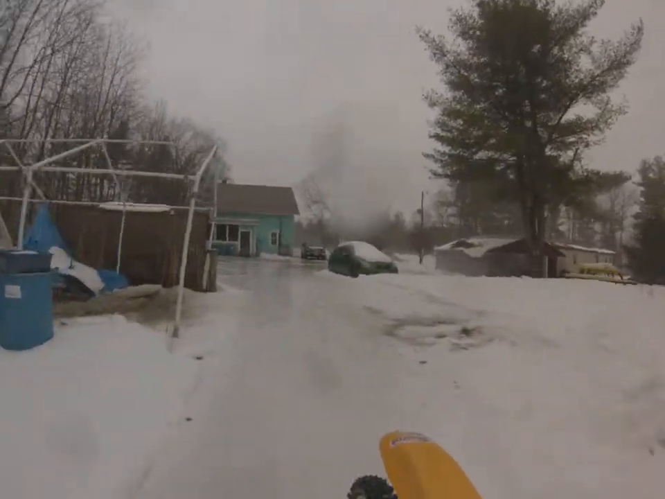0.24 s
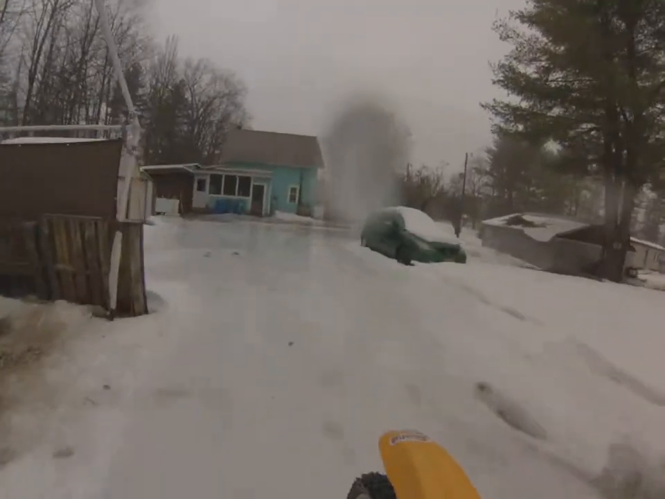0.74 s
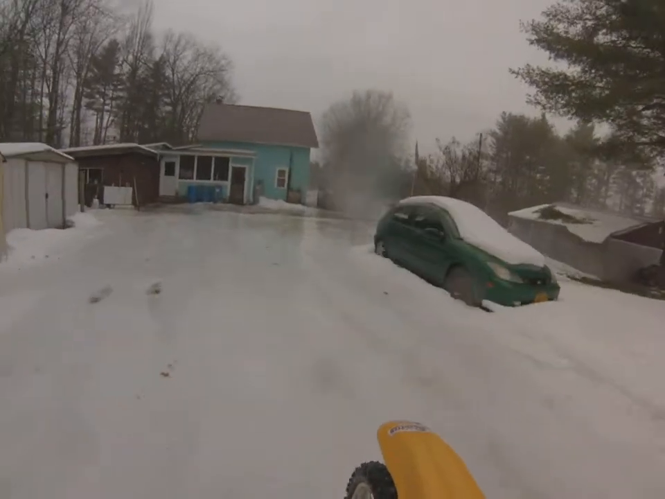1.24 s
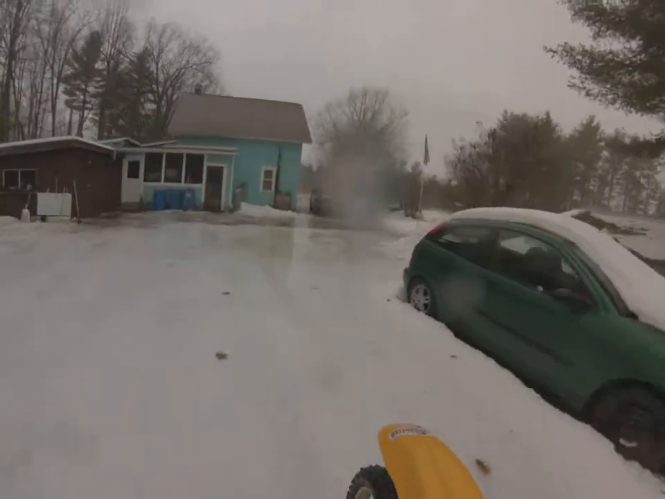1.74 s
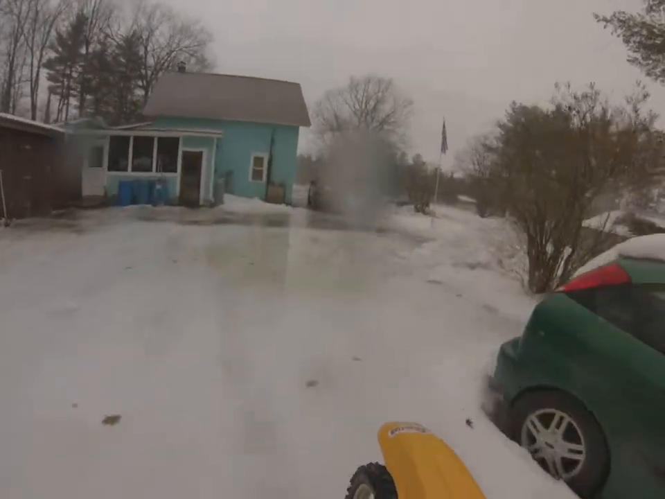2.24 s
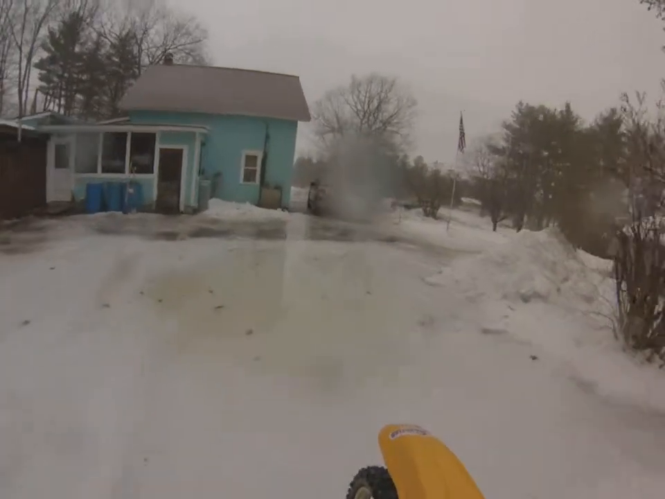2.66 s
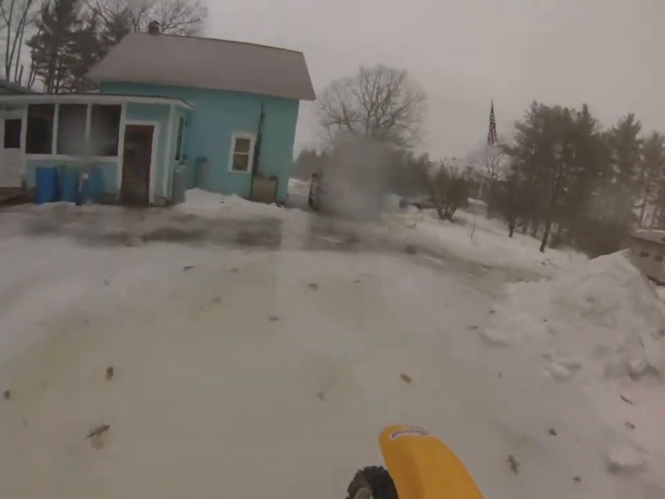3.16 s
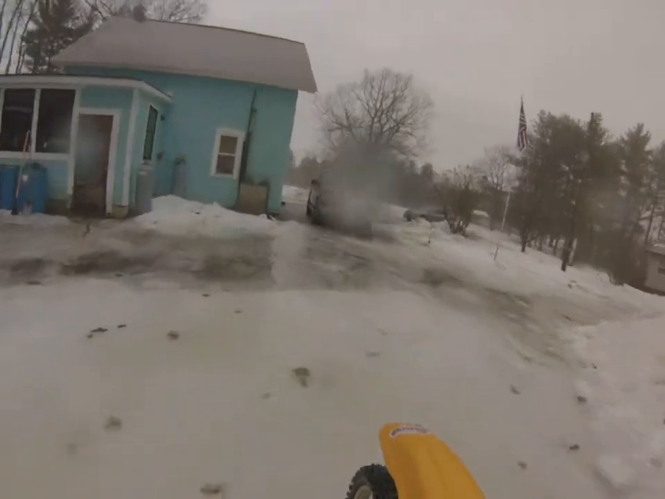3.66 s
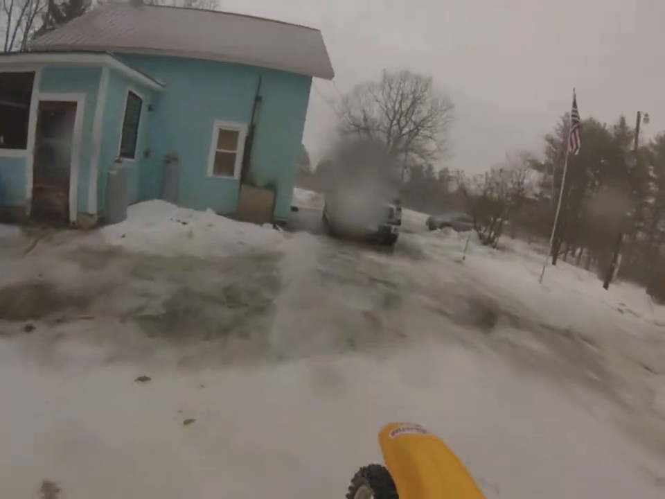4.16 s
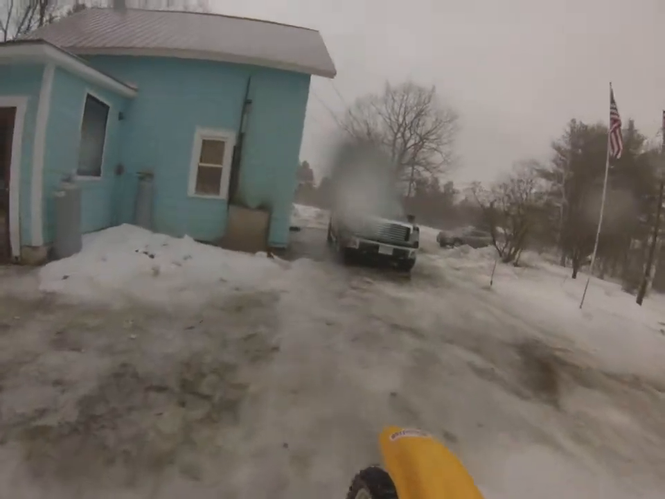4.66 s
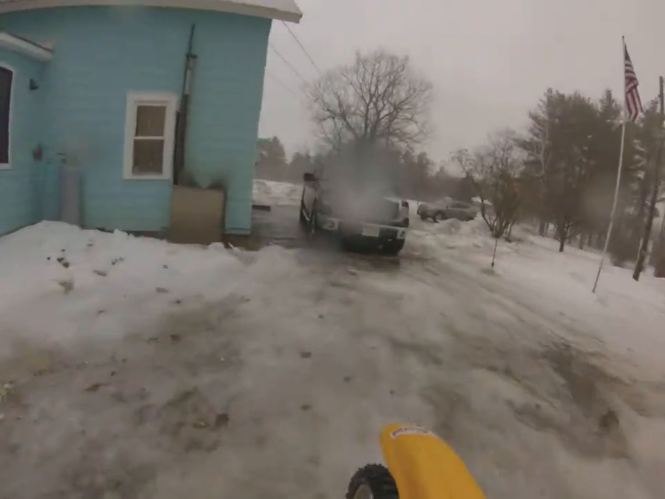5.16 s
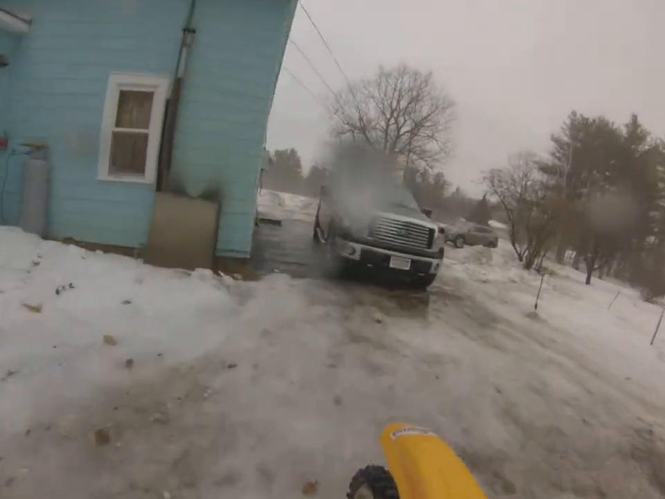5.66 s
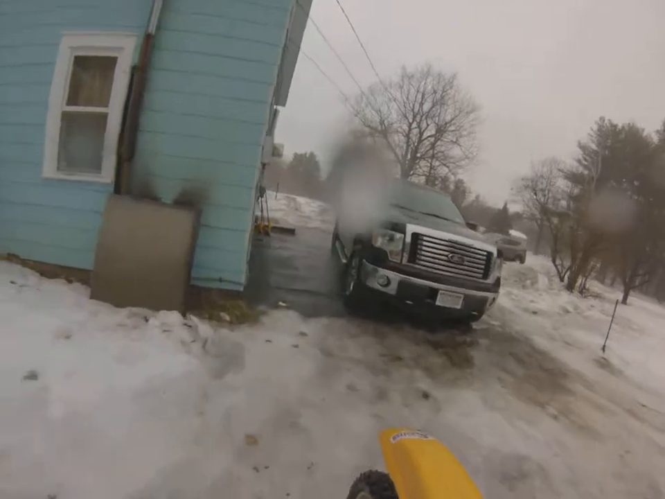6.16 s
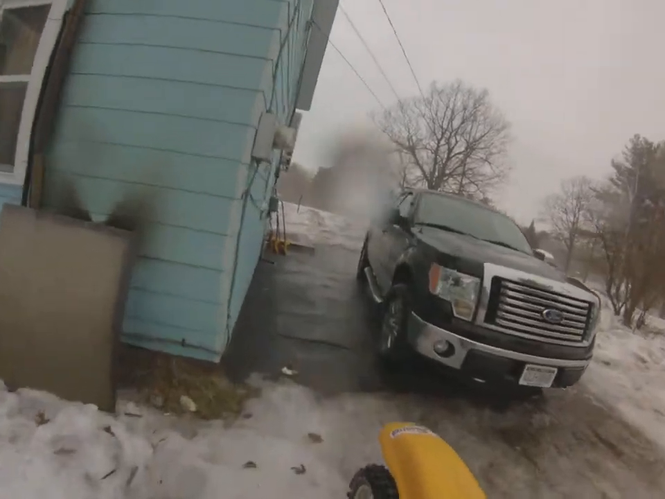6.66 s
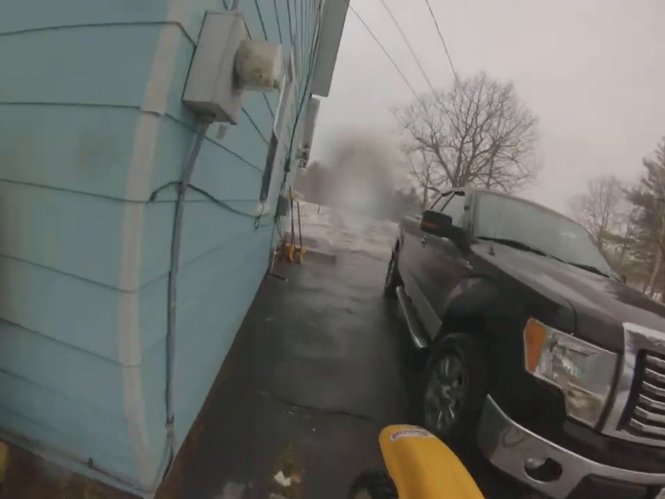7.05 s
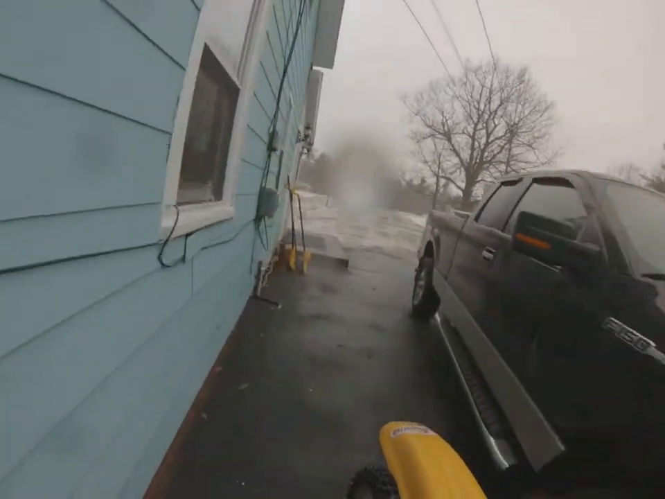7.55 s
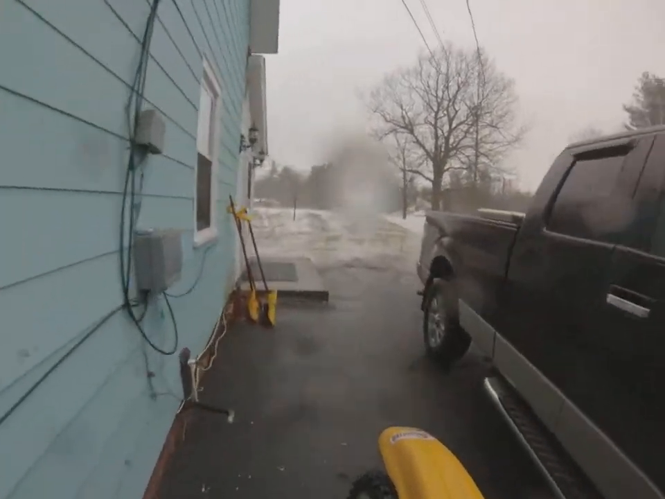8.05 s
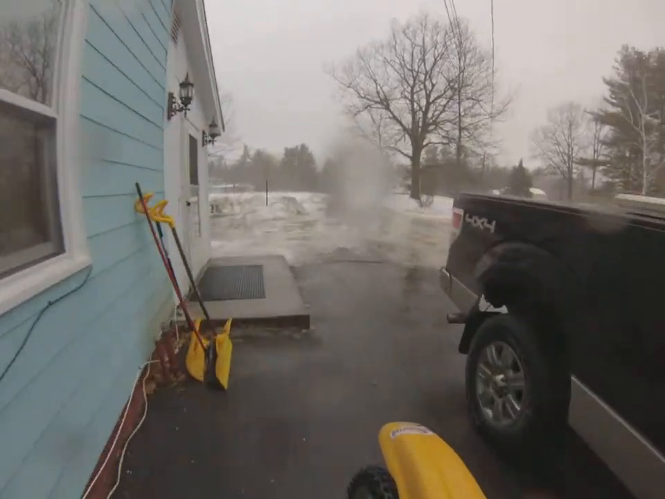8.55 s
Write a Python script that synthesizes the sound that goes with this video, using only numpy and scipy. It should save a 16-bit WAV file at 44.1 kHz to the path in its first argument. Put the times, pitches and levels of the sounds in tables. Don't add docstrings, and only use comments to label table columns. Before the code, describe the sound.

Buzzing two-stroke motor revs in two quick bursts, coasts lower, then sputters unevenly while muffled bumps, slush hiss and tiny ticks surround it.

```python
import sys
import numpy as np
from scipy import signal
from scipy.fft import rfft, irfft, next_fast_len
from scipy.io import wavfile
from scipy.ndimage import uniform_filter1d

SR = 44100
rng = np.random.default_rng(int(sys.argv[2]) if len(sys.argv) > 2 else 0)


def level_to_linear(level):
    exponent = np.asarray(level, float) / 20
    return 10 ** exponent


def store_wav(level_fs):
    pcm = np.round(np.clip(np.atleast_2d(level_fs), -1, 1) * 32767)
    wavfile.write(sys.argv[1], SR, pcm.T.astype(np.int16))


N = 388080

# [t/s, speed/(turns per s)]
CRANK_SPEED = [(0.0, 69.5), (0.24, 78), (0.29, 68.5), (0.39, 69.8), (0.51, 89), (0.66, 69.3), (0.81, 64),
               (0.97, 63.2), (1.22, 53.6), (1.51, 47.9), (1.75, 45.2), (2.42, 41.3), (3.05, 38),
               (3.6, 39.8), (4.1, 34.3), (4.65, 27.5), (5.6, 25.7), (8.8, 34.4)]
USUAL_THROTTLE_DB = -36


def in_time(rows):
    s, *columns = np.transpose(rows)
    return [np.interp(np.arange(N) / SR, s, c) for c in columns]


def rms_one(x):
    return x / np.sqrt(np.mean(x ** 2) + 1e-20)


def evened(x, over_s):
    return x / np.sqrt(np.maximum(uniform_filter1d(x ** 2, int(over_s * SR)), 1e-14))


def wander(over_s):
    span = int(over_s * SR)
    return rms_one(uniform_filter1d(uniform_filter1d(rng.standard_normal(N), span), span))


def stretches(rows, edge_s):
    t = np.arange(N) / SR
    return sum(level_to_linear(db) * np.clip(np.minimum(t - start, end - t) / edge_s + .5, 0, 1)
               for start, end, db in rows)


def butter(x, order, hz, kind="low"):
    return signal.sosfilt(signal.butter(order, hz, kind, fs=SR, output="sos"), x)


def resonance(x, hz, width_hz):
    r = np.exp(-np.pi * width_hz / SR)
    turn = 2 * r * np.cos(2 * np.pi * hz / SR)
    return signal.lfilter((1 - r * r) / 2 * np.array([1, 0, -1]), [1, -turn, r * r], x)


def body(drives, modes):
    out = 0
    for k, (drive, (hz, width_hz, db)) in enumerate(zip(drives, modes)):
        out = out + (-1) ** k * level_to_linear(db) * resonance(drive, hz, width_hz) / np.sqrt(width_hz / 100)
    return out


def colour(x, spectrum):
    hz, db = np.transpose(spectrum)
    size = next_fast_len(N)
    grid = np.maximum(np.arange(size // 2 + 1) * SR / size, 1)
    gain = level_to_linear(np.interp(np.log(grid), np.log(hz), db, -90, -90))
    return irfft(rfft(x, size) * gain, size)[:N]


def spikes(times, sizes):
    out = np.zeros(N)
    np.add.at(out, np.clip((np.asarray(times) * SR).astype(int), 0, N - 1), sizes)
    return out


def dying(clicks, rise_s, fall_s):
    for tau in (rise_s, fall_s):
        clicks = signal.lfilter([1], [1, -np.exp(-1 / (tau * SR))], clicks + 1e-18)
    return clicks / (rise_s * SR)


def bump(clicks, width_s):
    size = int(width_s * SR)
    return signal.oaconvolve(clicks, np.hanning(size) * np.geomspace(1, .12, size), "same")


def crank_turns(fired, slowing):
    turns = np.cumsum(in_time(CRANK_SPEED)[0]) / SR
    first = int(fired[0] * SR)
    turns += np.ceil(turns[first]) - turns[first]
    times = list(np.flatnonzero(np.diff(np.floor(turns[:first - 200]))) / SR)
    times.insert(0, 2 * times[0] - times[1])
    marks = []
    for start, end in zip(fired, [*fired[1:], N / SR + 0.19]):
        count = max(1, round((end - start) * np.interp(start, *np.transpose(CRANK_SPEED))))
        part = np.arange(count) / count
        marks.append(len(times))
        times += list(start + (end - start) * (part - slowing * part * (1 - part)))
    return np.array(times), np.array(marks)


def crank_angle(times):
    times = np.r_[2 * times[0] - times[[3, 2, 1]], times]
    turns = np.interp(np.arange(-500, N) / SR, times, np.arange(len(times)))
    return 2 * np.pi * uniform_filter1d(turns, size=500)[500:]


def rumble():
    # [f/Hz, level/dB per Hz]
    deep_spectrum = [(8.8, -32), (15, -4), (38, 5), (59, 1), (79, -6.5), (140, -27.5), (182, -21.5),
                     (220, -22), (290, -62), (480, -120)]
    return level_to_linear(-30.5) * rms_one(colour(rng.standard_normal(N), deep_spectrum))


def whine():
    # [f/Hz, level/dB]
    whine_tones = [(8448, -93), (12672, -90)]
    return sum(level_to_linear(db) * np.sin(2 * np.pi * hz * np.arange(N) / SR) for hz, db in whine_tones)


def mount(fires):
    # [t/s, level/dB, half length/s]
    ground_bumps = [(0.19, -16, 0.13), (0.528, -16, 0.059), (0.914, -19, 0.14), (2.334, -7, 0.037),
                    (3.273, -13.5, 0.023), (3.616, -10.5, 0.058), (3.759, -11.5, 0.03), (3.931, -14, 0.026),
                    (4.077, -13.5, 0.078), (4.42, -24, 0.048), (4.725, -16.5, 0.042), (4.9, -17.5, 0.12),
                    (5.17, -16, 0.064), (5.315, -14, 0.029), (5.55, -14.5, 0.09), (6.013, -17, 0.14),
                    (6.257, -19, 0.041), (6.443, -14.5, 0.045), (6.574, -24, 0.059), (6.71, -47, .03),
                    (6.842, -18.5, 0.1), (7.114, -20, 0.31), (7.366, -21, 0.071), (7.705, -17, 0.13),
                    (7.965, -20, 0.13), (8.23, -20.5, 0.23), (8.541, -15, 0.064), (8.76, -20.5, 0.11)]
    mount_hz, width_hz = 48.15, 2.22
    s, peak_db, _ = fires.T
    push = rms_one(spikes(s, level_to_linear(peak_db))) + 0.89 * rng.standard_normal(N)
    swing = resonance(resonance(push, mount_hz, width_hz), mount_hz, 3 * width_hz)
    t = np.arange(N) / SR
    height = level_to_linear(-37.5)
    for at, db, half_s in ground_bumps:
        height = height + level_to_linear(db) * np.exp(-((t - at) / half_s) ** 2)
    return level_to_linear(-8.0) * height * evened(swing, over_s=0.034)


def shake(times):
    # [speed/(turns per s), first, second, third order/dB]
    mount_response = [(29.7, -45, -44, -54.5), (40.8, -18.5, -52, -87), (43.6, -15.5, -36, -50),
                      (52.1, -13.5, -49, -50), (54.9, -33, -53, -51), (62, -18.5, -34.5, -53),
                      (79, -15.5, -31.5, -55), (93, -33, -32, -44)]
    angle = crank_angle(times)
    speed = in_time(CRANK_SPEED)[0]
    rate, *orders_db = np.transpose(mount_response)
    sway = 2.9 * np.sin(angle / 16.0)
    out = 0
    for k, db in enumerate(orders_db):
        wander_db = 3.5 * k * np.sin(angle / (7.3 + k) + sway)
        out = out + level_to_linear(np.interp(speed, rate, db) + wander_db) * np.sin((k + 1) * angle + k + 4.41)
    return np.sqrt(2) * out


def drops():
    # [t/s, level/dB at about 5.1 kHz, then level/dB at 2-3.5, 6.5-9 and 9-14 kHz]
    drop_taps = [(0.0515, -31, -31, -25, -43.5), (0.165, -40, -41, -44, -48.5), (0.859, -50, -43, -71, -61),
                 (1.195, -41, -40, -45, -57), (1.226, -46.5, -41, -54, -58.5),
                 (1.9899, -33, -35, -27.5, -48.5), (2.27, -51, -48, -57, -70), (2.4647, -52, -50, -61, -66),
                 (2.812, -53, -47, -54, -77), (2.86, -56, -44, -59, -64.5), (3.242, -39, -33.5, -62, -74),
                 (4.7316, -41, -42, -36, -46.5)]
    s, mid_db, low_db, bright_db, top_db = np.transpose(drop_taps)
    bands = [(2250, 1000, low_db + 4.0), (5130, 1400, mid_db),
             (7620, 390, bright_db - 0.5), (11000, 1500, top_db + 6.0)]
    out = 0
    for hz, width_hz, db in bands:
        bounce = .6 * spikes(s + 0.00096, level_to_linear(db + 17.0))
        taps = spikes(s, level_to_linear(db + 26.5)) - bounce + 1e-18
        out = out + resonance(resonance(taps, hz, width_hz), hz, 1.4 * width_hz)
    return out


def grit():
    # [t/s, peak level/dB]
    grit_hits = [(0.0232, -41), (0.0826, -40), (0.1071, -31), (0.344, -37), (0.3859, -42), (0.5436, -48),
                 (0.6199, -38), (0.6573, -34), (0.7496, -39), (0.779, -40), (0.827, -43), (0.8733, -44),
                 (0.8884, -42), (1.014, -41), (1.401, -42.5), (1.5997, -45.5), (1.667, -35), (1.706, -40),
                 (3.3877, -47), (5.1585, -46)]
    # [t/s, peak level/dB]
    later_grit_hits = [(2.9457, -55), (3.0954, -61), (3.1752, -53), (3.255, -55), (3.5134, -52), (3.6144, -61),
                       (3.6282, -51), (3.7145, -53), (3.7594, -60), (3.9265, -54), (3.9994, -58), (4.0128, -53)]
    s, db = np.transpose(list(grit_hits) + [(at, listed_db + 11) for at, listed_db in later_grit_hits])
    tint_db = rng.normal(0, 4.0, (len(s), 3))
    out = 0
    for k, (hz, width_hz, gain_db) in enumerate([(5400, 1500, 3.0), (7900, 1500, 10.0), (11200, 3000, 9.0)]):
        taps = spikes(s, level_to_linear(db + gain_db + tint_db[:, k])) + 1e-18
        out = out + resonance(resonance(taps, hz, width_hz), hz, width_hz)
    return out


def rattle(times):
    # [start t/s, end t/s, level/dB]
    rattle_fits = [
        (1.45, 1.76, -74.5),
        (2.2, 2.4, -81),
    ]
    ticks = spikes(times + 0.0049, level_to_linear(rng.normal(0, 5, len(times))))
    ticks = dying(ticks, rise_s=.0003, fall_s=0.0014)
    ring = resonance(ticks * rng.standard_normal(N), 10000, 2200)
    speed_gain = level_to_linear(-69.5 + 0.33 * (in_time(CRANK_SPEED)[0] - 81.0))
    return (speed_gain + stretches(rattle_fits, edge_s=.06)) * evened(ring, over_s=0.087)


def fin_ring(times, fired_s):
    # [f/Hz, width/Hz, level/dB]
    fin_modes = [(3060, 180, -70.5), (4140, 200, -77), (4580, 170, -81.5), (5410, 200, -76.5),
                 (6280, 220, -80)]
    taps = spikes(times + rng.normal(0.004, 0.00077, len(times)), level_to_linear(rng.normal(0, 2.5, len(times))))
    taps = taps + 0.89 * spikes(fired_s + 0.0036, 0.71)
    taps = (rms_one(dying(taps, rise_s=.0006, fall_s=.003)) + .3) * rng.standard_normal(N)
    out = 0
    for hz, width_hz, db in fin_modes:
        ring = resonance(resonance(taps, hz, width_hz), hz, 1.4 * width_hz)
        out = out + level_to_linear(db) * rms_one(ring)
    return out


def hiss(times, fires, open_db):
    # [f/Hz, level/dB per Hz]
    hiss_spectrum = [(2800, 9.5), (3400, -0.5), (4200, 2), (4900, 1), (5440, 0), (5900, -3.5), (6800, 0.5),
                     (7900, -3), (8800, -8), (10500, -9), (12300, -6), (14000, -18), (15000, -16),
                     (15600, -48)]
    # [start t/s, end t/s, level/dB]
    wet_ground = [
        (0.0, .1, -64),
        (1.5, 1.78, -66.5),
        (2.15, 2.5, -74),
        (3.05, 4.24, -65),
        (6.85, 7.5, -80),
        (7.5, 8.2, -73),
        (8.2, 8.85, -70.5),
    ]
    speed = in_time(CRANK_SPEED)[0]
    floor = level_to_linear(-72 + 1.09 * open_db + 0.1035 * (np.minimum(speed, 65.0) - 33.5))
    floor = floor * level_to_linear(3 * wander(0.024))
    slush = stretches(wet_ground, edge_s=0.2)
    pulsing = rms_one(bump(spikes(times + .005, level_to_linear(rng.normal(0, 3.5, len(times)))), width_s=.012))
    s, _, crack_db = fires.T
    crack = dying(spikes(s + 0.0068, level_to_linear(crack_db - 3.5)), rise_s=.002, fall_s=.008)
    noise = rms_one(colour(rng.standard_normal(N), hiss_spectrum))
    return (floor * (0.68 + 0.31 * pulsing) + slush + crack) * noise


def drone(times, open_db):
    # [order/(cycles per turn), level under the throttle/dB]
    drone_orders = [(4, -12), (5, -21), (6, -13), (7, -16), (8, -18), (9, -19), (10, -14), (11, -14),
                    (12, -16), (14, -21)]
    angle = crank_angle(times)
    lines = 0
    for order, db in drone_orders:
        line = np.sin(order * angle + rng.uniform(0, 2 * np.pi))
        lines = lines + level_to_linear(db + 4 * wander(0.11)) * line
    lines = butter(lines, 5, [235, 662], "band")
    fade = np.clip((3.72 - np.arange(N) / SR) / 1.4, 0, 1)
    return level_to_linear(USUAL_THROTTLE_DB + open_db) * fade * lines


def clatter(times, puff_db, steady_db, coasting):
    # [f/Hz, width/Hz, level/dB]
    case_modes = [(1186, 83, 2.5), (1478.6, 24, -4.5), (1619, 110, 2), (2000, 99, -3.5), (2140, 79, -10),
                  (2630, 300, -18.5), (2950, 40, -38)]
    noise = rng.standard_normal(N)
    between = level_to_linear(steady_db - 4 - 4.0 * coasting)
    drives = []
    for _ in case_modes:
        knock_db = .75 * puff_db + 1.5 * rng.standard_normal(len(times))
        knock = rms_one(bump(spikes(times + .004, level_to_linear(knock_db)), width_s=.014))
        drives.append((knock + between) * noise)
    out = butter(body(drives, case_modes), 3, 900, "high")
    shrill = level_to_linear(-5 + 0.25 * (np.minimum(in_time(CRANK_SPEED)[0], 47) - 26.5))
    out = out + shrill * resonance(out, 2760, width_hz=590)
    return butter(out, 8, 3250)


def pipe_blows(times, puff_db, steady_db, coasting, idle_from, open_db):
    # [f/Hz, width/Hz, level/dB]
    pipe_modes = [(251.8, 17, 0), (317, 43, -3.5), (452.6, 71.4, 4), (510.2, 59.4, 3.5), (631, 93, -4.5),
                  (706.3, 33, -9), (563.2, 79, -3.5), (784, 33, -17)]
    port_s = times - .002
    gas = rms_one(dying(spikes(port_s, level_to_linear(puff_db)), rise_s=.0015, fall_s=.006))
    gas = rms_one(gas + level_to_linear(steady_db)) * rng.standard_normal(N)
    clean = level_to_linear(4 - .05 * open_db + 1.0 * coasting)
    scatter_db = np.where(times < idle_from, 1.0, 2.5)
    speed = np.interp(times, *np.transpose(CRANK_SPEED))
    jitter_s = .00015 * level_to_linear(.17 * np.maximum(speed - 50, 0))
    blow_s = port_s + jitter_s * rng.standard_normal(len(times))
    drives = []
    for hz, _, _ in pipe_modes:
        blow_db = puff_db + scatter_db * rng.standard_normal(len(times))
        blow = resonance(rms_one(spikes(blow_s, level_to_linear(blow_db))), hz, width_hz=320)
        low_cut = np.where(coasting, 1, min(1, hz / 400))
        drives.append(clean * low_cut * blow + level_to_linear(-2.5) * gas)
    pipe = butter(body(drives, pipe_modes), 4, [205, 1050], "band")
    return pipe + level_to_linear(-21 + 1.65 * open_db) * resonance(pipe, 461, 180)


def echoes(tone):
    # [delay/s, level/dB]
    wall_echoes = [
        (.009, -20.5),
        (.017, -11.5),
        (.031, -14),
    ]
    wet, dull = tone.copy(), butter(tone, 2, 890)
    for lag_s, db in wall_echoes:
        lag = int(lag_s * SR)
        wet[lag:] += level_to_linear(db) * dull[:-lag]
    return wet


def exhaust(times, fired, peak_db, open_db):
    # [start t/s, end t/s, level over clatter/dB]
    rasp_fits = [
        (.15, .175, -11),
        (.455, .49, -2),
        (.49, .65, -7.5),
        (1.5, 2.05, -20),
    ]
    idle_from = times[fired[0]]
    steady_db = 1.5 - .8 * np.maximum(open_db - 8, 0)
    steady_db[int(idle_from * SR):] = 5
    puff_db = 1.2 * rng.standard_normal(len(times))
    puff_db[fired[0]:] += 8.5
    puff_db[fired[1:] - 1] += -1
    puff_db[fired] = peak_db + 34.5
    coasting = np.arange(N) < idle_from * SR
    pipe = pipe_blows(times, puff_db, steady_db, coasting, idle_from, open_db)
    knocks = clatter(times, puff_db, steady_db, coasting)
    knock_gain = level_to_linear(-10.5 + 0.86 * open_db) * (1 + stretches(rasp_fits, edge_s=0.0045))
    tone = level_to_linear(open_db) * evened(pipe, over_s=0.33) + knock_gain * evened(knocks, over_s=0.26)
    return echoes(level_to_linear(USUAL_THROTTLE_DB) * tone)


def scene():
    # [t/s, peak level/dB, bright crack level/dB]
    idle_firings = [(4.145, -23.5, -60), (4.334, -23, -54), (4.525, -22.5, -54), (4.702, -17, -55),
                    (4.893, -17, -57), (5.074, -27, -58), (5.189, -22, -54), (5.304, -17, -58),
                    (5.372, -22, -56), (5.438, -19.5, -53), (5.502, -20, -57), (5.568, -20.5, -55),
                    (5.626, -20.5, -55), (5.69, -26.5, -55), (5.753, -22.5, -56), (5.85, -16.5, -53),
                    (5.95, -17, -51.5), (6.044, -21, -56), (6.14, -17.5, -51), (6.236, -15.5, -54),
                    (6.329, -20, -53), (6.427, -22, -52), (6.52, -18, -54), (6.614, -20, -52),
                    (6.708, -20.5, -54), (6.774, -22.5, -53), (6.839, -29, -53), (6.932, -31, -58),
                    (7.037, -20.5, -56), (7.099, -28.5, -52), (7.163, -26.5, -53), (7.226, -30, -58),
                    (7.259, -25, -53), (7.329, -23, -52), (7.394, -23.5, -49), (7.46, -25.5, -50),
                    (7.525, -24.5, -50), (7.614, -26.5, -50), (7.68, -23, -50), (7.744, -21.5, -49),
                    (7.84, -18, -49.5), (7.932, -20.5, -49), (8.023, -19, -52), (8.116, -20, -48),
                    (8.171, -22, -50), (8.256, -21.5, -61), (8.292, -23.5, -53), (8.35, -28.5, -50),
                    (8.412, -25, -49), (8.473, -20.5, -52), (8.588, -19, -53), (8.67, -22.5, -53),
                    (8.727, -23, -63)]
    # [t/s, peak level/dB]
    half_firings = [(4.171, -29.5), (4.423, -25), (4.487, -22.5), (4.589, -23.5), (4.661, -21),
                    (4.77, -19.5), (5.035, -22), (5.105, -26), (5.146, -24), (5.656, -24.5), (5.781, -23),
                    (5.912, -22.5), (6.008, -20.5), (6.103, -25), (6.26, -24.5), (6.292, -24.5),
                    (6.392, -18.5), (6.577, -23.5), (6.673, -24), (6.997, -27.5), (7.064, -26.5),
                    (7.355, -27), (7.555, -23), (8.438, -28.5), (8.644, -22)]
    # [t/s, level/dB]
    throttle_curve = [(0.0, -25.5), (.135, -20), (.22, -22), (.278, -28), (.385, -27.5), (.4, -23.5),
                      (.472, -20), (.63, -28), (1.044, -30.5), (1.236, -35.5), (1.37, -31.5), (1.55, -40.5),
                      (1.83, -39), (2.38, -34.5), (4.1, -36.5), (6.1, -34.5), (7.5, -35.5), (8.8, -35)]
    fires, coughs = np.array(idle_firings), np.array(half_firings)
    times, fired = crank_turns(fires[:, 0], slowing=0.1974)
    coughed = np.argmin(abs(times[:, None] - coughs[:, 0]), axis=0)
    times[coughed] = coughs[:, 0]
    all_fired = np.r_[fired, coughed]
    peak_db = np.r_[fires[:, 1], coughs[:, 1]]
    open_db = in_time(throttle_curve)[0] - USUAL_THROTTLE_DB
    surroundings = rumble() + whine() + mount(fires) + shake(times) + drops() + grit()
    bright = rattle(times) + fin_ring(times, fires[:, 0]) + hiss(times, fires, open_db)
    engine = drone(times, open_db) + exhaust(times, all_fired, peak_db, open_db)
    return (surroundings + bright + engine)[None]


def roll_off(x):
    return signal.sosfilt(signal.butter(12, 15700, fs=SR, output="sos"), x)


def record(dry):
    soft = 1.191 * np.tanh(dry / 1.138)
    return roll_off(soft)


dry = scene()
out = record(dry)
store_wav(out)
```